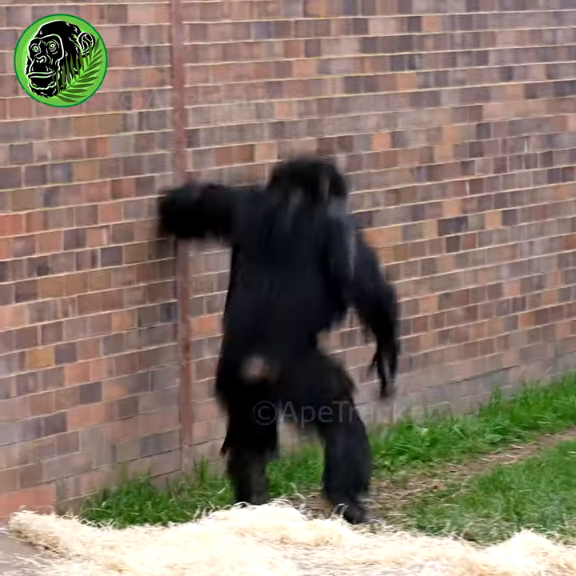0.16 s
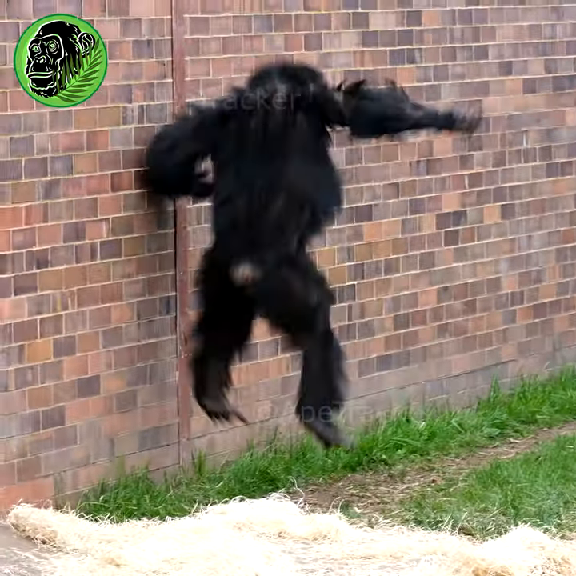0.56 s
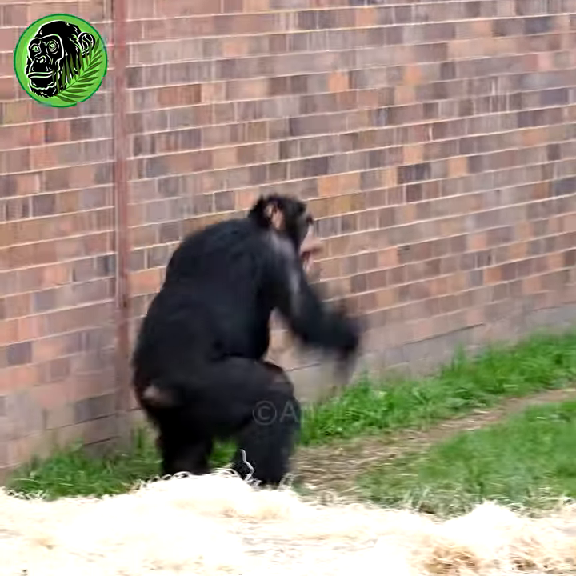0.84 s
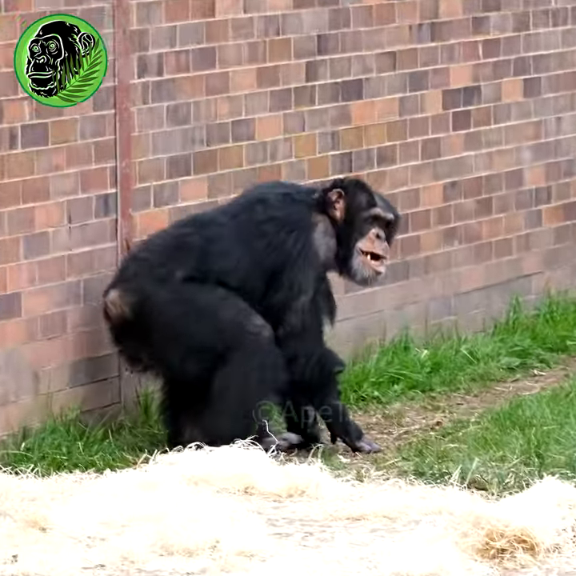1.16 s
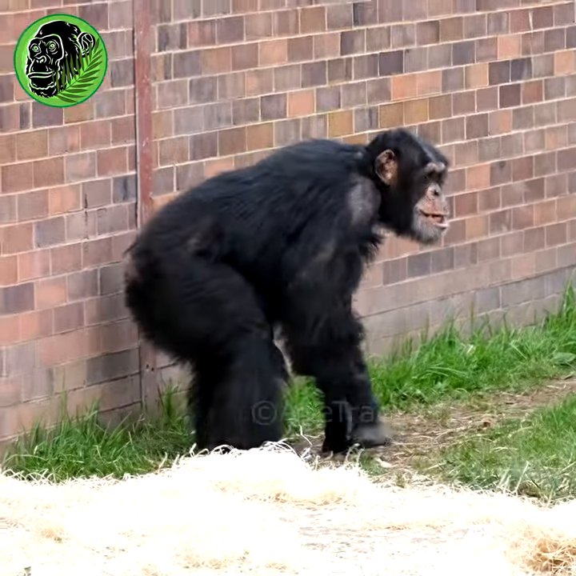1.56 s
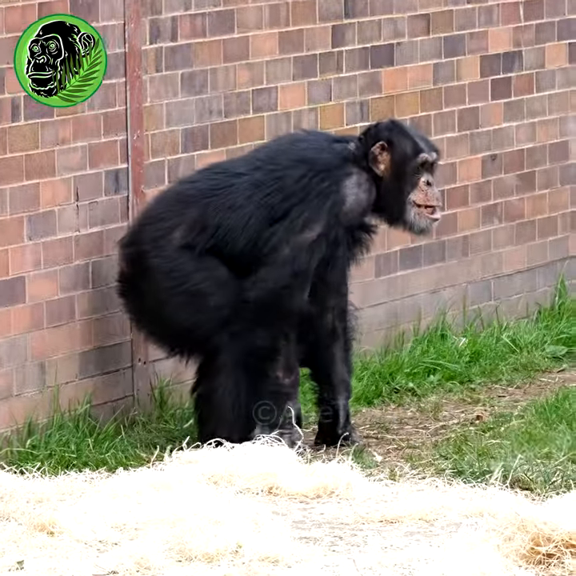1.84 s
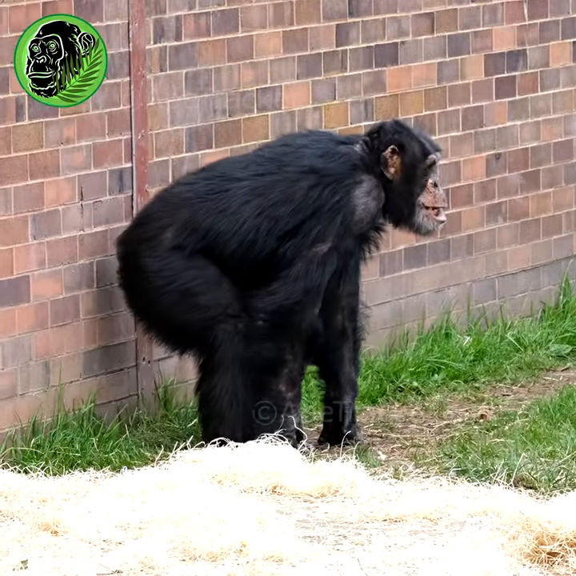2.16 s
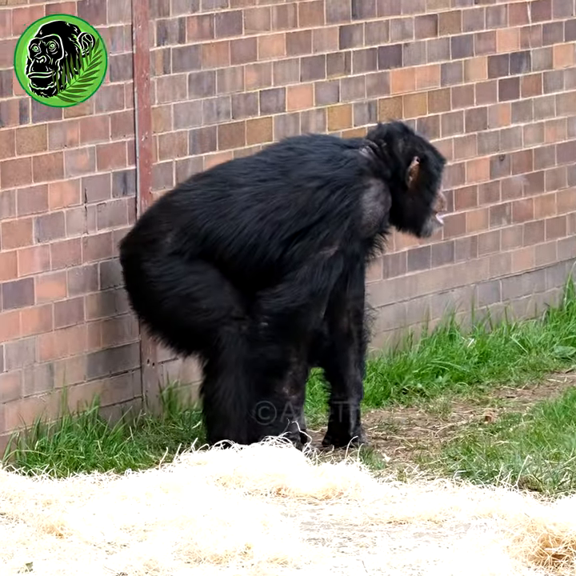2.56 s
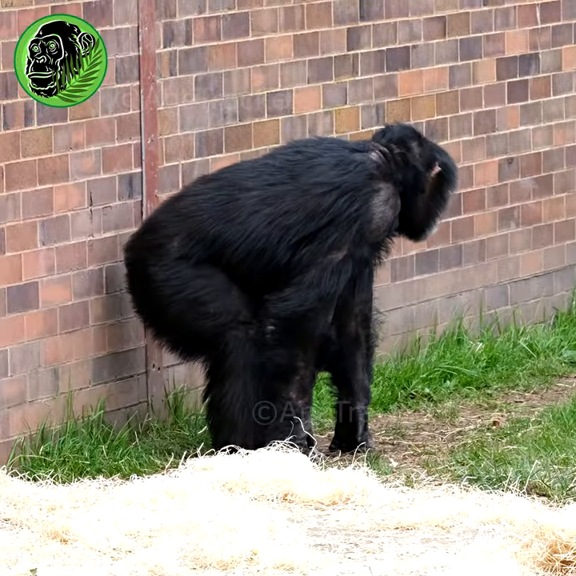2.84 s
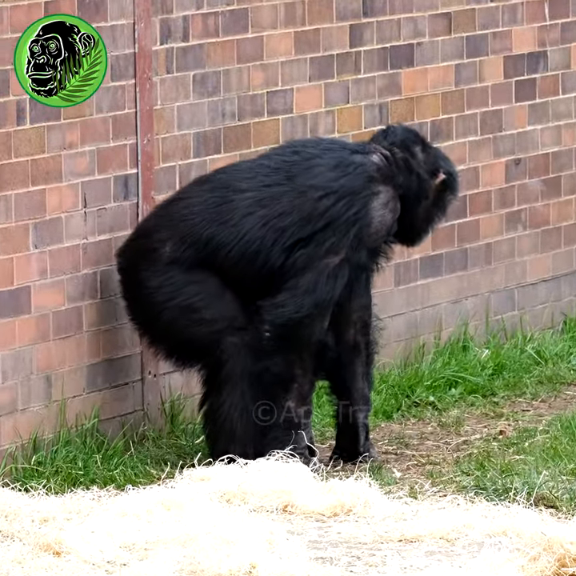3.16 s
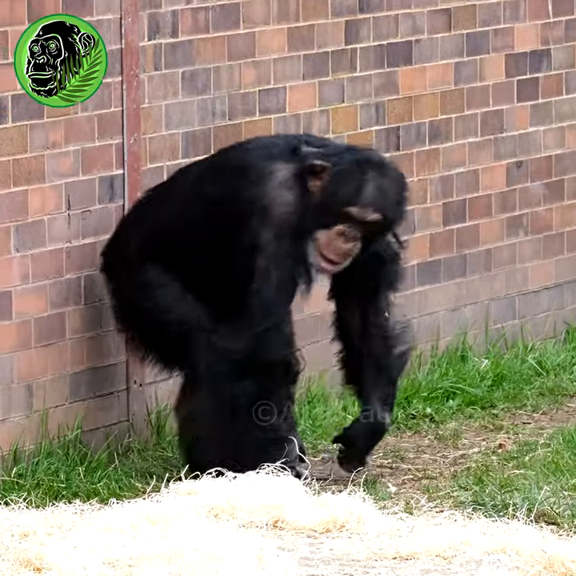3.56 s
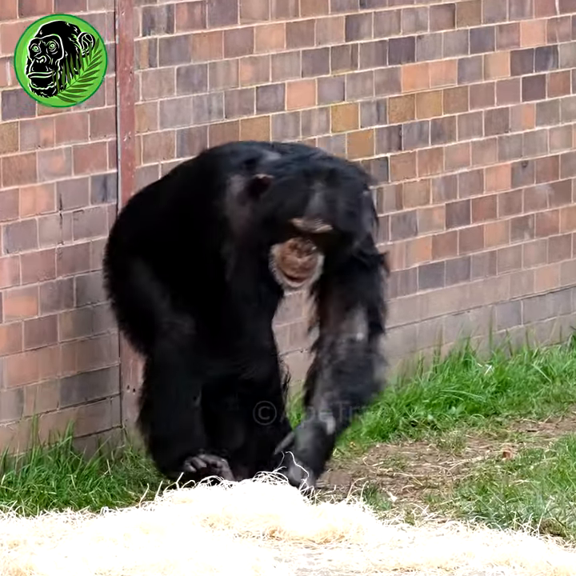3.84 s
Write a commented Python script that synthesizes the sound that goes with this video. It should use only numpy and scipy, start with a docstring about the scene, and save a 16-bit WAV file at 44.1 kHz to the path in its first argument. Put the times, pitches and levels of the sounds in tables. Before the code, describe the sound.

A chimpanzee screams from 0 s, loud, harsh and layered, high at first, then sliding down by 0.5 s and cracking into rough hoots. A low rising grunt and wavering moan end it near 1 s, and the echo off brick walls dies away. Thin bird whistles follow, mostly 1.6-2.8 s, then a soft buzz near 2.9 s, with sparse dry ticks, far birds, outdoor air and low machinery rumble.

```python
"""A walled outdoor enclosure: a chimpanzee screams in overlapping harsh voices that sink and break up
into hoots, a rising grunt and a last moan, all echoing off the brick. Cries are jittering overtones
and gated noise through a throat; hoots are arched tones. Afterwards a small bird sings a falling
phrase of gliding whistles and a buzz, with far birds; dry noise ticks fall among the cries and later.
Filtered noise makes the air and low rumble, wavering sines the hum of distant machinery."""
import sys
import numpy as np
from scipy import signal
from scipy.fft import rfft, irfft, next_fast_len
from scipy.io import wavfile
from scipy.ndimage import uniform_filter1d, minimum_filter1d, map_coordinates

SR = 44100
rng = np.random.default_rng(int(sys.argv[2]) if len(sys.argv) > 2 else 0)


def output_pcm(signal):
    """Save a mono or channel-first signal as 16-bit PCM at the path in sys.argv[1].

    Samples are clipped to [-1, 1] before scaling.
    """
    pcm = np.clip(np.atleast_2d(signal).T, -1, 1) * 32767
    wavfile.write(sys.argv[1], SR, np.round(pcm).astype(np.int16))


N = 176400


def amp(db):
    """Decibels to gain."""
    return 10 ** (np.asarray(db) / 20)


def unit(x):
    """Scale to rms 1."""
    return x / np.sqrt(np.mean(x ** 2) + 1e-20)


def along(points, hz):
    """Interpolate (Hz, value) points on a log frequency axis."""
    f, v = np.transpose(points)
    return np.interp(np.log(hz + 1), np.log(f + 1), v)


def curves(rows):
    """One value per sample for each column after the time."""
    s, *cols = np.transpose(rows)
    return [np.interp(np.arange(N) / SR, s, c) for c in cols]


def wobble(rate, size=N):
    """Smooth random curve, rate knots a second."""
    knots = rng.standard_normal(8000)
    return map_coordinates(knots, [np.arange(size) * rate / SR + 2], mode="wrap")


def seconds(length_s):
    """Sample times of a note."""
    return np.arange(int(length_s * SR)) / SR


def cycles(hz):
    """Running phase of a pitch curve, in radians."""
    return 2 * np.pi * np.cumsum(hz) / SR


def filtered(x, response):
    """Multiply the spectrum of x by a response of frequency."""
    m = next_fast_len(N + SR // 2)
    return irfft(rfft(x, m) * response(np.fft.rfftfreq(m, 1 / SR)), m)[..., :N]


def gate(t, length, attack, release):
    """Smooth attack, hold and release."""
    ramp = np.minimum(t / attack, (length - t) / release)
    return np.sin(np.pi / 2 * np.clip(ramp, 0, 1)) ** 2


def add(track, s, sound):
    """Mix a sound in at time s."""
    part = track[max(round(s * SR), 0):][:len(sound)]
    part += sound[:len(part)]


def pan(db):
    """Raise left and lower right by db; negative leans right."""
    return amp([[db], [-db]])


# stereo width: hz, side_over_mid_db
STEREO_WIDTH = [(50, -29), (110, -30), (200, -19), (380, -10), (700, -9.5), (1300, -6), (2400, -1),
                (4400, -0.5), (9000, -3)]


def diffuse(spectrum):
    """Stereo noise of rms 1, near mono in the bass and wide in the treble."""
    def mid_side(hz):
        turn = np.arctan(amp(along(STEREO_WIDTH, hz)))
        return amp(along(spectrum, hz)) * [np.cos(turn), np.sin(turn)]
    mid, side = filtered(rng.standard_normal((2, N)), mid_side)
    return unit(np.array([mid + side, mid - side]))


JITTER_PER_S, WAVER, WAVER_PER_S, FLUTTER_HZ = 700, 0.009, 90, 232.6
TEAR_DB, TEAR_PER_S = 3.5, 130
DULL_FROM_HZ = 1290


def cry(rows, throat, jitter, flutter_rad, dull_db_per_octave, rasp_db, count):
    """Jittering, fluttering vocal folds and a rasp gated once a cycle, through the throat."""
    pitch, db, rough = curves(rows)
    rough = np.clip(rough, 0, 1)
    drift = jitter * np.sqrt(rough) * wobble(JITTER_PER_S) + WAVER * wobble(WAVER_PER_S)
    phase = cycles(pitch * (1 + drift))
    shake = flutter_rad * rough * np.sin(cycles(FLUTTER_HZ * (1 + 0.252 * wobble(60))))
    t = np.arange(N) / SR
    sounding = (t >= rows[0][0]) & (t < rows[-1][0])
    tone, folds, hz_now = np.zeros(N), (phase + shake)[sounding], pitch[sounding]
    for k in range(1, count + 1):
        # each overtone flares and drops on its own, fully from 3 kHz up
        tear = TEAR_DB * np.minimum(k * hz_now / 3000, 1) * wobble(TEAR_PER_S, len(folds))
        tone[sounding] += amp(along(throat, k * hz_now) + tear) * np.sin(k * folds)
    breath = rng.standard_normal(N) * (1 + np.cos(phase))
    rasp = filtered(breath, lambda hz: amp(along(throat, hz)))
    voice = np.sqrt(1 - rough) * tone / tone[sounding].std()
    voice = voice + amp(rasp_db) * np.sqrt(rough) * unit(rasp)
    # treble lost per octave the pitch sinks; gained if negative
    treble = filtered(voice, lambda hz: 1 - 1 / (1 + (hz / 2800) ** 4))
    octaves_down = np.maximum(np.log2(DULL_FROM_HZ / pitch), 0)
    voice = voice + treble * (amp(-dull_db_per_octave * octaves_down) - 1)
    return voice * amp(db) * sounding


# main scream: time_s, pitch_hz, level_db, roughness_0_1
SCREAM_PATH = [(0, 1143, -18.5, 0.08), (.035, 1162, -19, 0.22), (.07, 1163, -17, 0.14),
               (.125, 1155, -26, 0.18), (.2, 1161, -19.5, 0.5), (.25, 1099, -19.5, 0.43),
               (.295, 1128, -20.5, 0.22), (.335, 1013, -13.5, 0.36), (.39, 852, -22.5, 0.1),
               (.43, 915, -25.5, 0.8), (.49, 925, -19.5, 0.84), (.53, 750, -63, 1)]
# throat with bared teeth: hz, gain_db
SCREAM_FORMANTS = [(400, -33), (750, -3), (1130, -1.5), (1600, -10.5), (2250, -3), (2800, -5.5),
                   (3450, -4.5), (4000, -2.5), (4600, -4), (5600, -8.5), (6700, -15.5), (9000, -20.5),
                   (15000, -28.5)]


def scream():
    """Harsh main voice that dulls as its pitch sinks."""
    return cry(SCREAM_PATH, SCREAM_FORMANTS, jitter=0.0098, flutter_rad=0.96,
               dull_db_per_octave=61, rasp_db=0, count=13)


# second scream: time_s, pitch_hz, level_db, roughness_0_1
SHRILL_PATH = [(0, 1167, -25.5, 0.46), (.075, 1203, -21, 0.07), (.12, 1226, -25.5, 0.44),
               (.165, 1231, -23, 0.31), (.21, 1228, -22, 0.22), (.24, 1223, -47, 0.06),
               (.29, 1177, -43, 0.3), (.33, 1120, -61, 0.6)]
# its throat: hz, gain_db
SHRILL_FORMANTS = [(500, -23), (1200, -22), (1700, -50), (2500, -11.5), (3000, -12), (3650, -2), (4200, -9),
                   (4900, -4), (5600, -15.5), (6600, -25.5), (15000, -41.5)]


def shrill():
    """Shriller voice whose close pitch beats against the first."""
    return cry(SHRILL_PATH, SHRILL_FORMANTS, jitter=0.016, flutter_rad=0.55,
               dull_db_per_octave=-11, rasp_db=4, count=12)


# third scream: time_s, pitch_hz, level_db, roughness_0_1
SLIDE_PATH = [(0, 1059, -21.5, 0.01), (.04, 1074, -23, 0), (.07, 1150, -36, 0), (.115, 1127, -24, 0.09),
              (.15, 1085, -35, 0.27), (.185, 1095, -32, 0.01), (.215, 1021, -26, 0.17),
              (.265, 914, -24.5, 0.1), (.3, 806, -25.5, 0)]
# throat of slide and squeal: hz, gain_db
SLIDE_FORMANTS = [(600, -29), (1050, -2.5), (1750, -3), (2200, -2.5), (2900, -13.5), (3400, -2.5),
                  (4450, -4), (5400, -10.5), (7000, -40), (14000, -39)]


def slide():
    """Smoother voice that rises briefly, then slides down below the other two."""
    return cry(SLIDE_PATH, SLIDE_FORMANTS, jitter=0.016, flutter_rad=0.7,
               dull_db_per_octave=0, rasp_db=1, count=8)


# squeal: time_s, pitch_hz, level_db, roughness_0_1
SQUEAL_PATH = [(.488, 885, -60, 0.24), (.505, 867, -32, 0), (.516, 828, -37, 0.2), (.535, 810, -63, .3)]


def squeal():
    """Short falling squeal that ends the screaming."""
    return cry(SQUEAL_PATH, SLIDE_FORMANTS, jitter=0.011, flutter_rad=0.3,
               dull_db_per_octave=-2, rasp_db=-3, count=8)


# hoots and yelps: start_s, length_s, pitch_hz, level_db, roughness_0_1
HOOT_NOTES = [(0.158, 0.065, 894, -22, 0.14), (.25, 0.12, 885, -26, 0.46),
              (0.274, 0.088, 1402, -20.5, 0.97), (0.334, 0.041, 883.5, -13, 0.24),
              (.371, 0.032, 841.4, -11.5, 0), (0.407, 0.072, 879.4, -25.5, 0.4),
              (0.466, 0.05, 883, -12.5, 0.35), (0.486, 0.069, 618.5, -24, 0.79),
              (.508, 0.083, 816.5, -27, 0.66), (0.536, 0.062, 593.5, -21, 0.37),
              (0.586, 0.0907, 874.3, -20.5, 0.56), (0.621, 0.068, 732, -24.5, 1.01),
              (0.717, 0.0804, 861, -22, 1), (0.735, 0.044, 761.3, -19.5, 0.5),
              (.749, 0.025, 833, -21, 0.32), (0.833, 0.11, 898, -28.5, 0.9), (0.836, 0.06, 686, -26, 1),
              (0.904, 0.026, 940, -29, .3), (0.978, 0.062, 910, -49, .05)]
OVERTONE_DB, ROLLOFF_DB_PER_OVERTONE = -28.5, 11.5
HOOT_ARCH, HOOT_FALL, HOOT_WAVER = 0.06, 0.017, 0.012  # fractions of pitch
HOOT_RASP_PER_S, HOOT_ATTACK_S, HOOT_RELEASE_S = 228, 0.011, 0.007
ROUGH_SWELL_S = 0.014  # rough hoots swell and fade more slowly


def hoots():
    """Nearly pure arched notes; the rough ones shudder in level and phase."""
    out = np.zeros(N)
    for s, length, hz, db, rough in HOOT_NOTES:
        t = seconds(length)
        u, r = 2 * t / length - 1, np.clip(rough, 0, 1)
        bend = 1 - HOOT_ARCH * u ** 4 - HOOT_FALL * u + HOOT_WAVER * wobble(121.0, len(t))
        phase = cycles(hz * bend)
        rasp = wobble(HOOT_RASP_PER_S, len(t)) + 1j * wobble(HOOT_RASP_PER_S, len(t))
        shudder = np.sqrt(2 * (1 - r)) + np.sqrt(r) * rasp
        tone = np.exp(1j * phase)
        for k in range(2, 6):
            tone += amp(OVERTONE_DB - ROLLOFF_DB_PER_OVERTONE * (k - 2.5)) * np.exp(1j * k * phase)
        swell = r * ROUGH_SWELL_S
        shape = gate(t, length, HOOT_ATTACK_S + swell, HOOT_RELEASE_S + swell)
        add(out, s, amp(db) * unit((tone * shudder).real) * shape)
    return out


# grunt, as the ape lands: time_s, pitch_hz, level_db, roughness_0_1
GRUNT_PATH = [(.765, 135.1, -27.5, 0.13), (.8, 160.7, -27, 0.02), (.825, 190.2, -27.5, 0.14),
              (.85, 223.5, -26.5, 0.28), (.88, 237, -32.5, 0.12), (.915, 218, -35, .5),
              (.945, 205, -64, 0.3)]
# its throat: hz, gain_db
GRUNT_FORMANTS = [(150, 1), (380, 3), (560, -3), (1080, -6.5), (1400, -15), (3000, -20), (4000, -14.5),
                  (12000, -35)]


def grunt():
    """Low voice that rises in pitch, then dips as it fades."""
    return cry(GRUNT_PATH, GRUNT_FORMANTS, jitter=0.027, flutter_rad=0.16,
               dull_db_per_octave=0, rasp_db=0, count=8)


# closing moan: time_s, pitch_hz, level_db, roughness_0_1
MOAN_PATH = [(.785, 540, -28, 0), (.82, 522, -34, 0.1), (.845, 561.3, -26.5, 0.05), (.885, 560, -30, 0.04),
             (.912, 501.2, -29, 0.11), (.938, 522, -33, 0.06), (.97, 566, -30, .02),
             (1, 548.6, -35.5, 0.07), (1.03, 530, -40, .05)]
# its throat: hz, gain_db
MOAN_FORMANTS = [(500, -8), (1080, 1), (1650, -8.5), (2800, -20.5), (3700, -11.5), (7000, -35.5)]


def moan():
    """Wavering voice of four partials with a little rasp."""
    return cry(MOAN_PATH, MOAN_FORMANTS, jitter=0.06, flutter_rad=0.8,
               dull_db_per_octave=0, rasp_db=7, count=4)


# reverberation of the enclosure: hz, t60_s
YARD_DECAY = [(150, 0.33), (900, 1.14), (2500, 0.96), (5000, 1.03), (12000, 1.75)]
WALLS_DB = -8  # six slaps together


def yard(x, wet_db):
    """Direct sound, a few early slaps off the brick walls and a diffuse tail."""
    noise = diffuse([(20, 0), (20000, 0)])[:, :SR + SR // 2]
    hz, t, z = signal.stft(noise, SR, nperseg=256)
    decay = amp(-60 * t / along(YARD_DECAY, hz)[:, None]) * (1 - np.exp(-t / 0.0014))
    tail = signal.istft(z * decay, SR, nperseg=256)[1]
    tail = tail / np.linalg.norm(tail[0])
    delays_s, skews = rng.uniform(.004, .045, size=6), rng.integers(-4, 5, size=6)
    for delay_s, skew in zip(delays_s, skews):
        left = int(delay_s * SR)
        tail[[0, 1], [left, left + skew]] += amp(WALLS_DB) / np.sqrt(6)
    return x + amp(wet_db) * signal.fftconvolve(x[None], tail, axes=1)[:, :N]


APE_LEAD_S, LEAD_TOP_HZ = 0.000033, 6330


def lead_right(calls):
    """Advance the right channel slightly; the phase offset stops growing above LEAD_TOP_HZ."""
    def turn(hz):
        half_rad = np.pi * np.minimum(hz, LEAD_TOP_HZ) * APE_LEAD_S
        return np.exp(1j * half_rad * np.array([[-1], [1]]))
    return filtered(calls, turn)


# bird notes: start_s, length_s, first_hz, middle_hz, last_hz, level_db
BIRD_NOTES = [(1.052, 0.015, 4800, 5300, 5700, -55), (1.432, 0.022, 6540, 5970, 5520, -58.5),
              (1.635, 0.065, 7900, 6920, 6800, -53.5), (1.739, .018, 6630, 7100, 7050, -48),
              (1.749, 0.025, 7200, 6670, 7550, -47.5), (1.774, 0.028, 8300, 8500, 8600, -61),
              (1.775, 0.024, 6040, 6000, 5830, -45.5), (1.882, 0.03, 6400, 6260, 6200, -49.5),
              (1.976, .024, 7050, 7600, 6800, -58), (1.989, 0.043, 6900, 6280, 4350, -50),
              (2.114, 0.053, 5200, 6770, 6840, -52.5), (2.136, .065, 6010, 5820, 5700, -45),
              (2.249, 0.028, 4850, 5630, 7500, -50.5), (2.272, 0.02, 5570, 5260, 5000, -46),
              (2.332, 0.053, 5400, 6660, 6600, -52.5), (2.451, 0.019, 4720, 5630, 7100, -49.5),
              (2.468, 0.028, 5220, 5300, 5030, -45), (2.531, 0.019, 5100, 5800, 6600, -49),
              (2.548, 0.029, 6450, 6430, 6400, -56.5), (2.636, 0.042, 4890, 5055, 4990, -44),
              (2.658, 0.024, 5840, 5430, 5150, -50), (2.733, 0.2, 4090, 4370, 4410, -58.5),
              (3.356, 0.41, 4160, 4110, 4080, -67.5), (3.811, 0.028, 3820, 3780, 4200, -51.5),
              (3.947, 0.038, 2850, 2330, 2130, -49)]
# buzz late in the song: time_s, pitch_hz, level_db
BUZZ_PATH = [(2.8, 4370, -60), (2.87, 4350, -48.5), (2.93, 4150, -54.5), (3.03, 4120, -52.5),
             (3.15, 4200, -60.5), (3.3, 4210, -68)]
BUZZ_SPREAD, BUZZ_PER_S = 0.068, 1100
BIRD_WAVER, BIRD_RAMP_S = 0.014, 0.0057


def birds():
    """Gliding whistles, and a buzz from fast random pitch modulation."""
    pitch, db = curves(BUZZ_PATH)
    buzz_phase = cycles(pitch * (1 + BUZZ_SPREAD * wobble(BUZZ_PER_S)))
    start, end = BUZZ_PATH[0][0], BUZZ_PATH[-1][0]
    out = amp(db) * np.sqrt(2) * np.sin(buzz_phase)
    out = out * gate(np.arange(N) / SR - start, end - start, BIRD_RAMP_S, BIRD_RAMP_S)
    for s, length, first, middle, last, db in BIRD_NOTES:
        t = seconds(length)
        glide = np.polyval(np.polyfit([0, .5, 1], [first, middle, last], 2), t / length)
        note = np.sin(cycles(glide * (1 + BIRD_WAVER * wobble(254.5, len(t)))))
        level = amp(db + 0.67 * wobble(90, len(t)))
        add(out, s, level * unit(note) * gate(t, length, BIRD_RAMP_S, BIRD_RAMP_S))
    return out


# light dry ticks: time_s, level_db
TICK_TIMES = [(.447, -35), (0.464, -37), (.631, -32.5), (0.734, -32), (0.795, -30.5), (2.018, -38.5),
              (3.22, -43), (3.443, -45)]
# their spectrum: hz, gain_db
TICK_SPECTRUM = [(1000, -26), (4000, -9), (7500, -4.5), (11000, -11), (15000, -4)]
TICK_T60_S, TICK_PAN_DB = 0.01, -5
TAP_S, TAP_HZ, TAP_DB, TAP_T60_S = 3.07, 2200, -35, 0.01


def ticks():
    """Brief bright noise ticks and one small woody tap, a decaying sine."""
    t, level, tap = np.arange(SR // 10) / SR, np.zeros(N), np.zeros(N)
    for s, db in TICK_TIMES:
        add(level, s, amp(db - 60 * t / TICK_T60_S))
    add(tap, TAP_S, amp(TAP_DB - 60 * t / TAP_T60_S) * np.sin(2 * np.pi * TAP_HZ * t))
    return level * diffuse(TICK_SPECTRUM) * pan(TICK_PAN_DB) + tap


# distant birds: start_s, length_s, first_hz, last_hz, level_db
FAR_NOTES = [(2.039, 0.13, 4070, 3980, -61), (2.547, .035, 4250, 4170, -56), (2.582, .09, 3200, 3540, -60),
             (3.016, 0.21, 5060, 4990, -66), (3.113, .11, 3300, 3530, -60),
             (3.676, 0.093, 3750, 3500, -59.5), (3.69, 0.137, 2200, 2120, -61),
             (3.926, 0.059, 4150, 4180, -60)]
FAR_SPREAD, FAR_PER_S = 0.032, 330


def far_birds():
    """Soft, slowly gliding notes with randomly shaken pitch."""
    out = np.zeros(N)
    for s, length, first, last, db in FAR_NOTES:
        t = seconds(length)
        glide = np.linspace(first, last, len(t))
        note = np.sin(cycles(glide * (1 + FAR_SPREAD * wobble(FAR_PER_S, len(t)))))
        add(out, s, amp(db) * unit(note) * gate(t, length, BIRD_RAMP_S, BIRD_RAMP_S))
    return out


# outdoor air spectrum: hz, gain_db
AIR_SPECTRUM = [(180, -37), (300, -6), (581, -6), (863, -1.5), (1620, -13.5), (2980, -22.5), (4280, -25.5),
                (15000, -35)]


def air():
    """Steady broadband noise, strongest below 1 kHz."""
    return amp(-43 + 0.082 * wobble(2.55)) * diffuse(AIR_SPECTRUM)


# rumble spectrum: hz, gain_db
RUMBLE_SPECTRUM = [(13, -55), (22, -5), (70, -4), (101, -5.5), (129, -1.5), (184, -5), (450, -20.5),
                   (580, -21), (990, -120)]
# rumble level: time_s, level_db
RUMBLE_PATH = [(0, -31.5), (1, -33), (1.7, -35.5), (2.3, -38.5), (3.2, -40.5), (4, -37.5)]


def rumble():
    """Distant machinery as low noise with an uneven level."""
    (db,) = curves(RUMBLE_PATH)
    return amp(db + 0.9 * wobble(6.9)) * diffuse(RUMBLE_SPECTRUM)


# hum level: time_s, level_db
HUM_PATH = [(0, -39), (1.2, -36), (1.85, -39), (2.2, -48.5), (4, -45.5)]
HUM_HZ, HUM_OCTAVE_DB = 49.1, -42


def hum():
    """Wavering machine hum: a low sine and its octave."""
    (db,) = curves(HUM_PATH)
    phase = cycles(HUM_HZ * (1 + 0.016 * wobble(4.78)))
    low = amp(db + wobble(7.0)) * unit(np.sin(phase))
    octave = unit(np.sin(2 * phase + 0.64 * wobble(13)))
    return low + amp(HUM_OCTAVE_DB + 2.3 * wobble(4.3)) * octave


SCREAM_WET_DB, HOOT_WET_DB, GRUNT_WET_DB, MOAN_WET_DB = -2.5, -5.5, -1, -9.5
BIRD_WET_DB, FAR_WET_DB = -6, 4.5
SCREAM_PAN_DB, SHRILL_PAN_DB, BIRD_PAN_DB = -0.35, 0.7, 4.5


def scene():
    """Ape calls and birds in the enclosure, over the background."""
    calls = yard(scream() + slide() + squeal(), SCREAM_WET_DB) * pan(SCREAM_PAN_DB)
    calls = calls + yard(shrill(), SCREAM_WET_DB) * pan(SHRILL_PAN_DB)
    calls = calls + yard(hoots(), HOOT_WET_DB)
    calls = calls + yard(grunt(), GRUNT_WET_DB) + yard(moan(), MOAN_WET_DB)
    song = yard(birds(), BIRD_WET_DB) * pan(BIRD_PAN_DB) + yard(far_birds(), FAR_WET_DB)
    return lead_right(calls) + song + ticks() + air() + rumble() + hum()


CEILING_DB, LIMITER_HOLD_S, TOP_HZ = -5.5, 0.018, 15800


def record(dry):
    """A limiter holds down the loudest peaks; a steep low-pass cuts at TOP_HZ."""
    hold = max(int(LIMITER_HOLD_S * SR), 2)
    needed = np.minimum(1, amp(CEILING_DB) / (np.abs(dry).max(axis=0) + 1e-9))
    gain = uniform_filter1d(minimum_filter1d(needed, hold), hold)
    return filtered(dry * gain, lambda hz: hz < TOP_HZ)


dry = scene()
out = record(dry)
output_pcm(out)
```